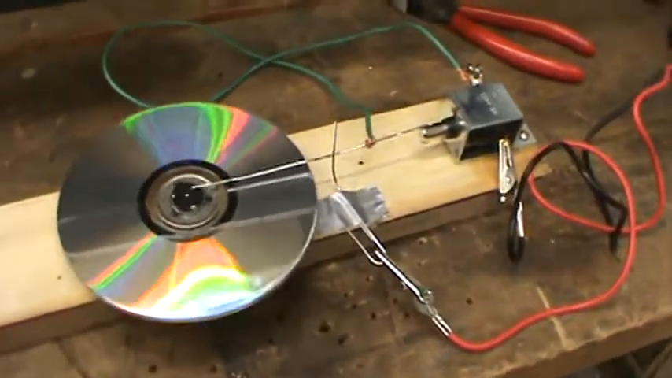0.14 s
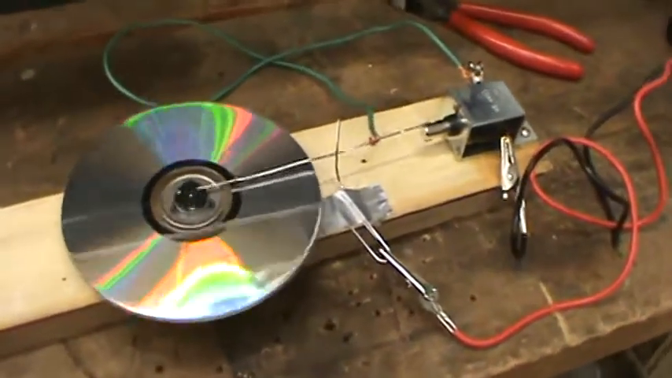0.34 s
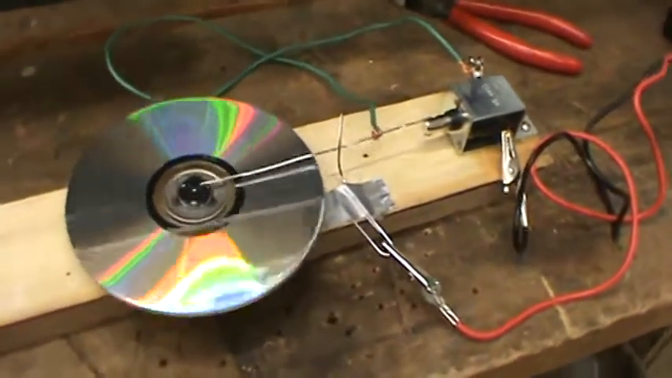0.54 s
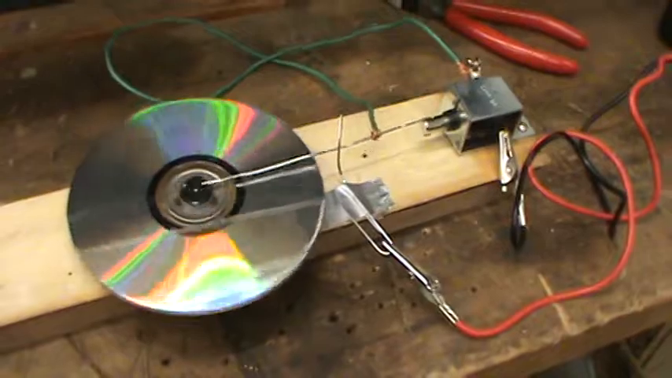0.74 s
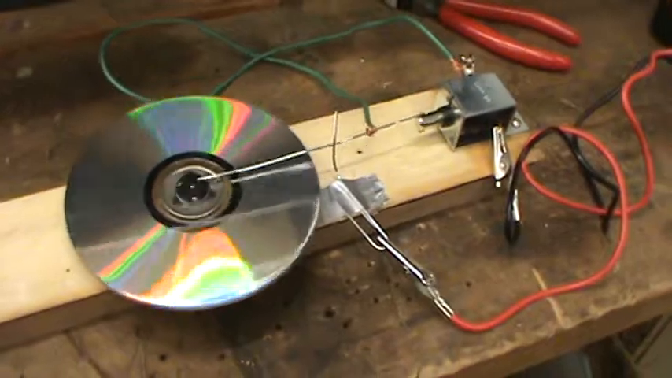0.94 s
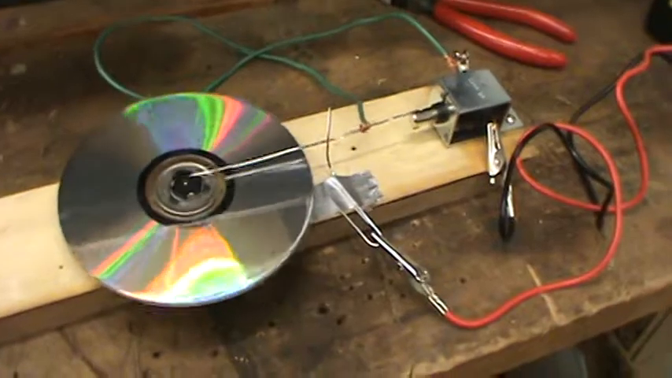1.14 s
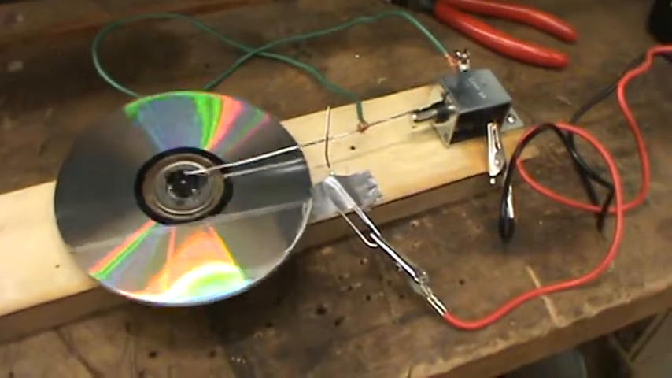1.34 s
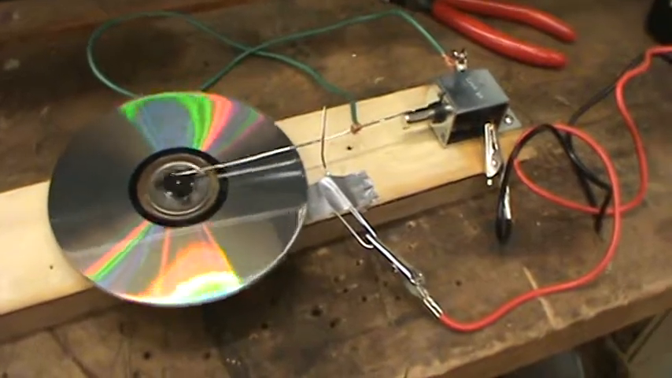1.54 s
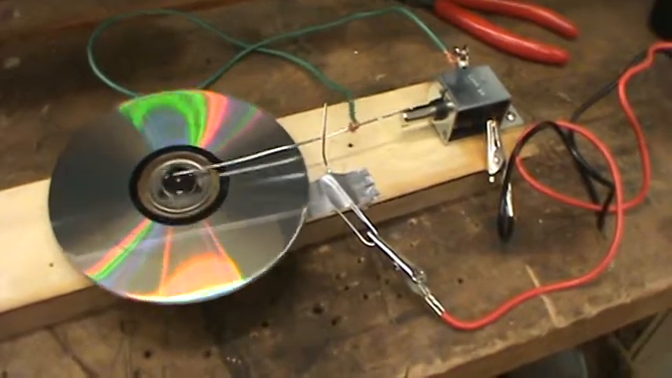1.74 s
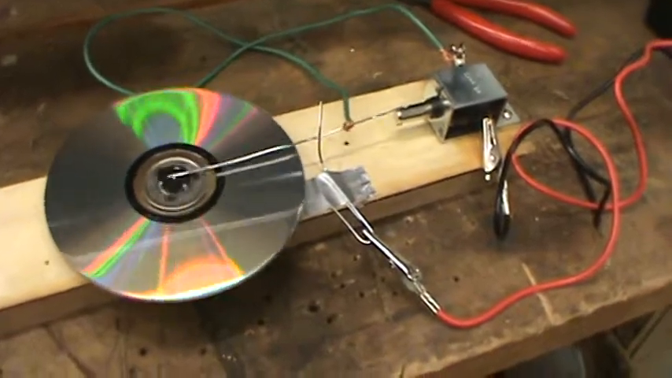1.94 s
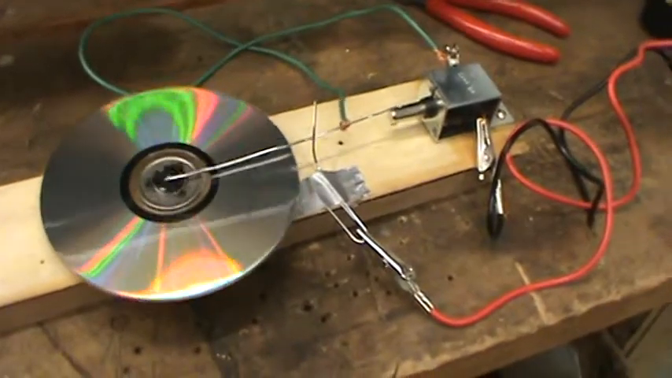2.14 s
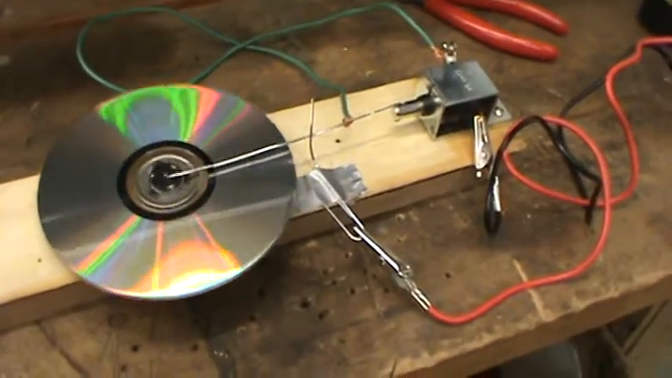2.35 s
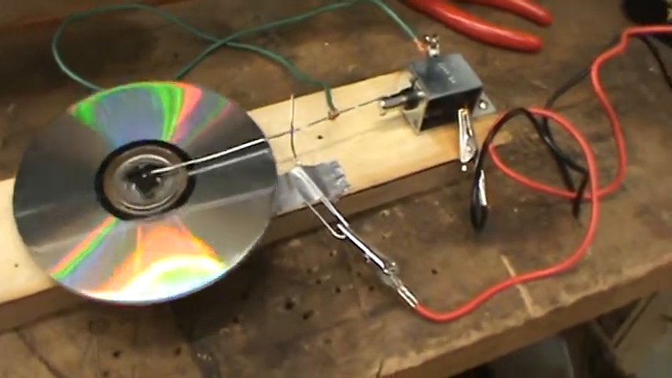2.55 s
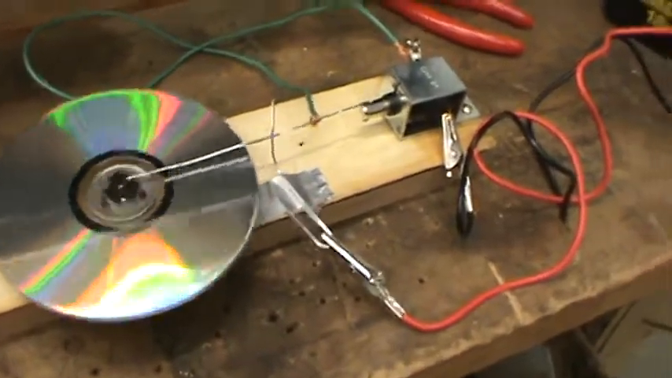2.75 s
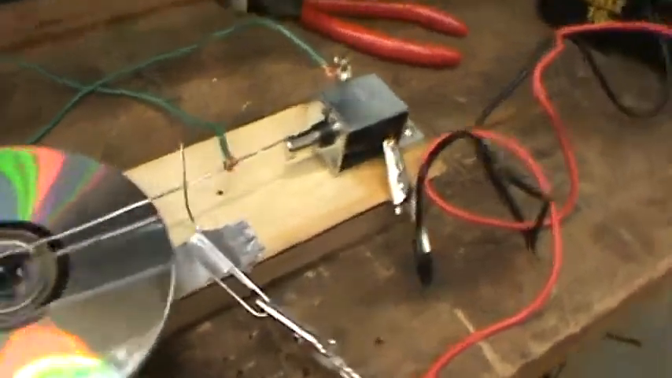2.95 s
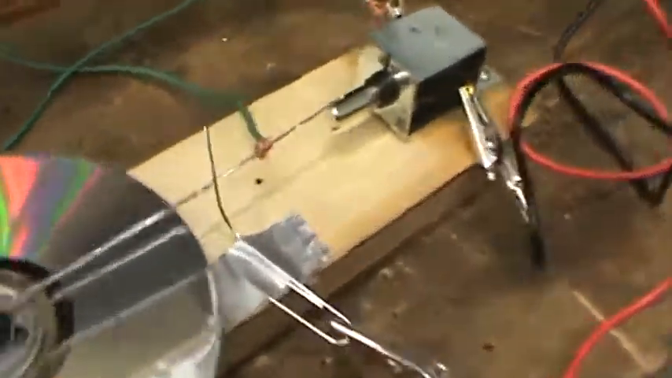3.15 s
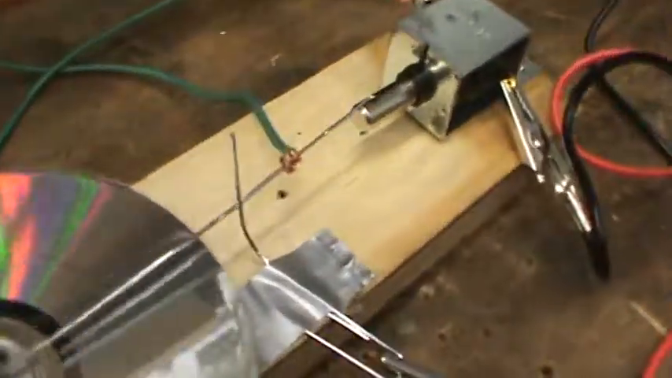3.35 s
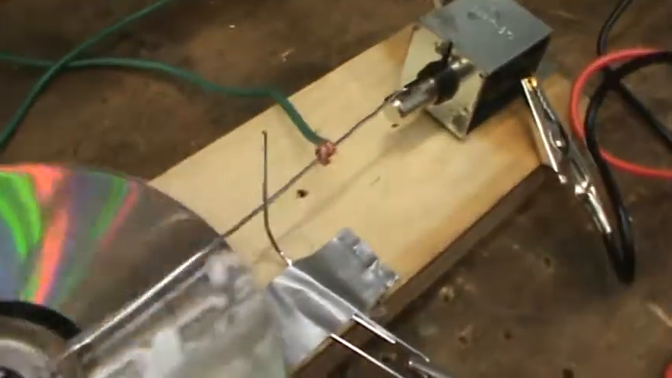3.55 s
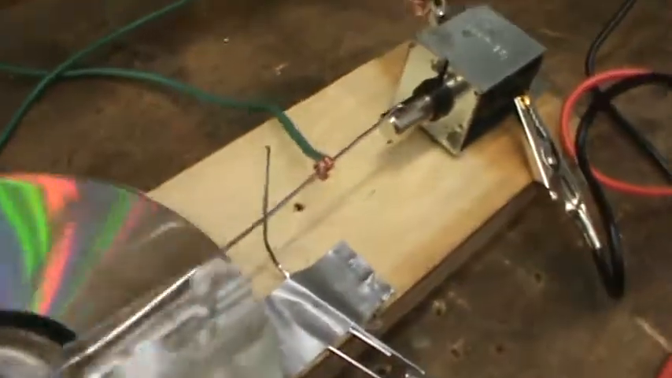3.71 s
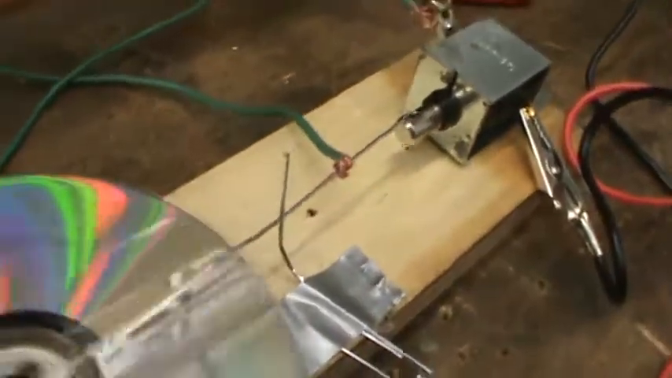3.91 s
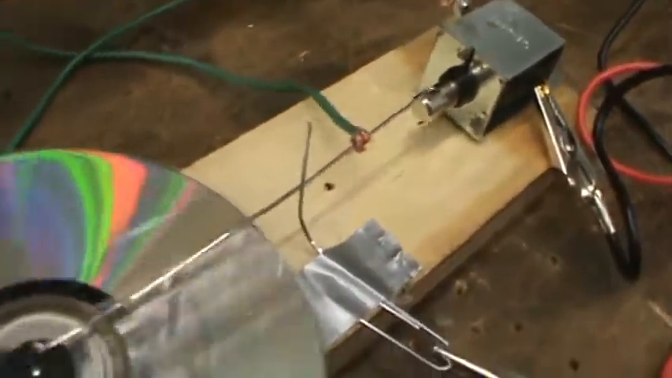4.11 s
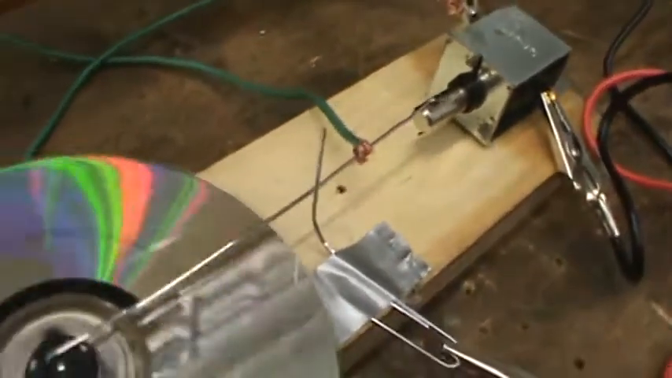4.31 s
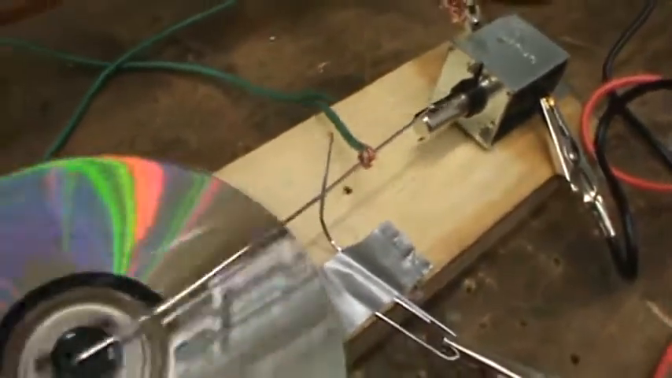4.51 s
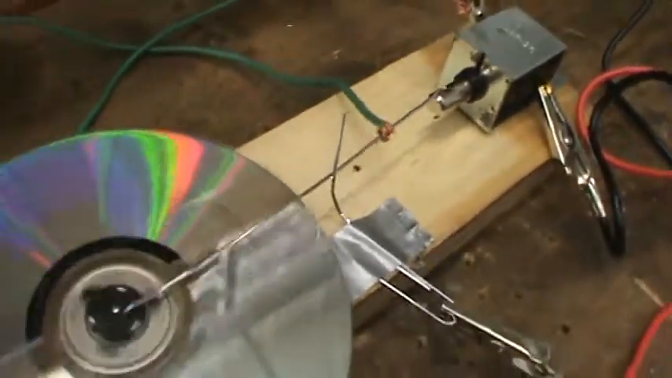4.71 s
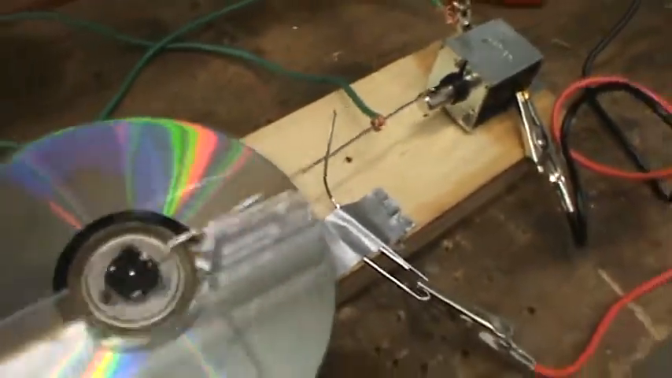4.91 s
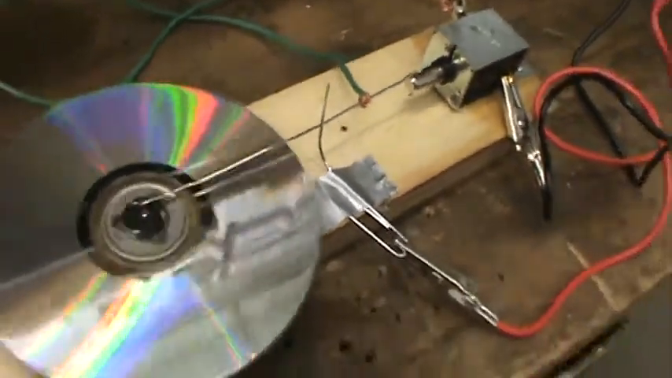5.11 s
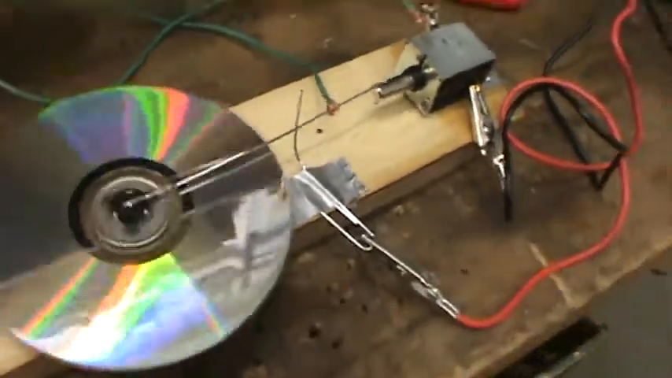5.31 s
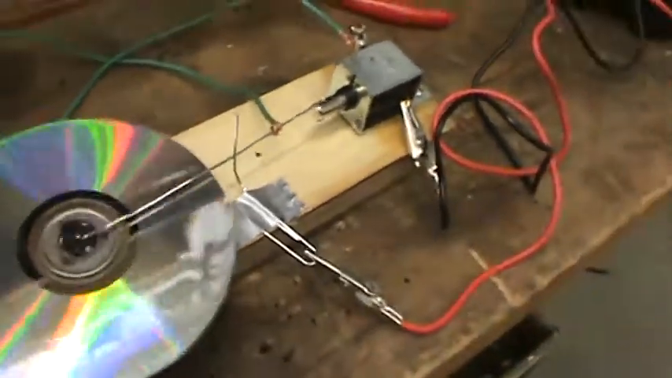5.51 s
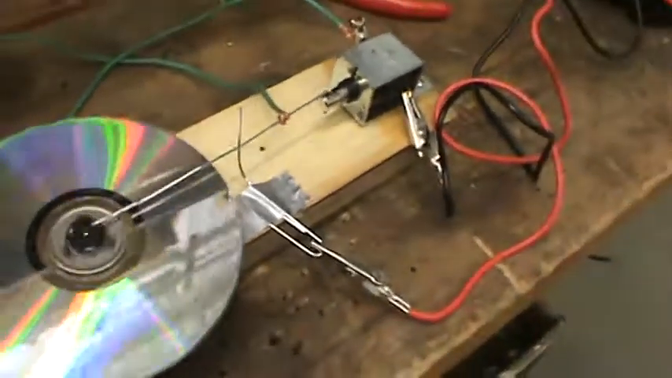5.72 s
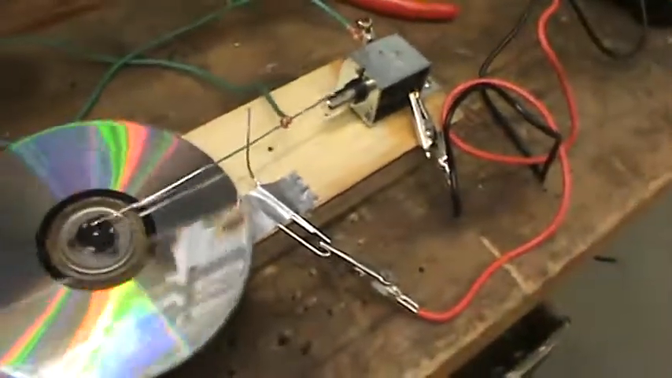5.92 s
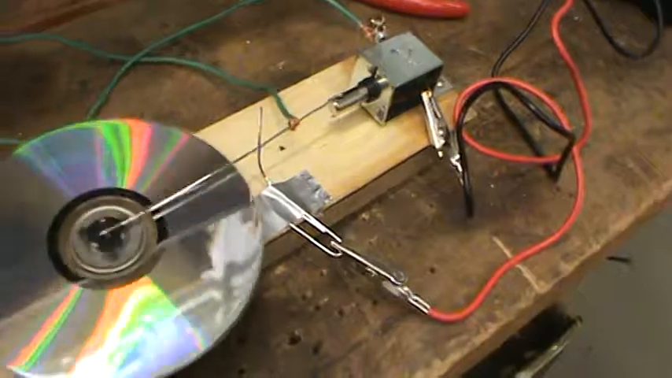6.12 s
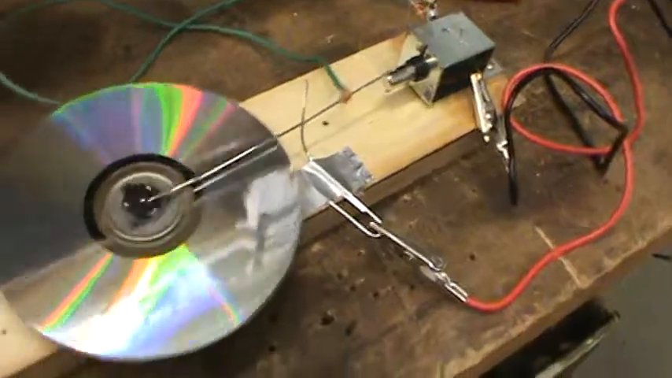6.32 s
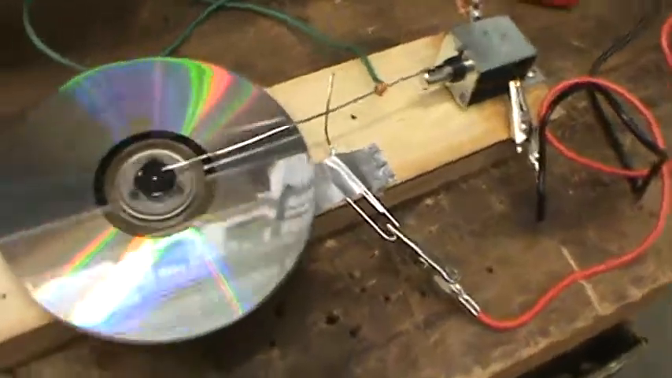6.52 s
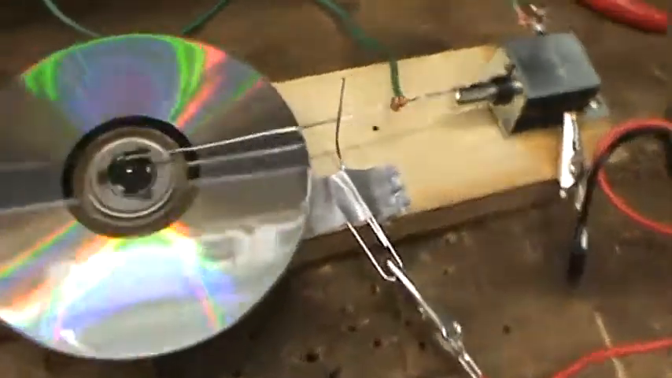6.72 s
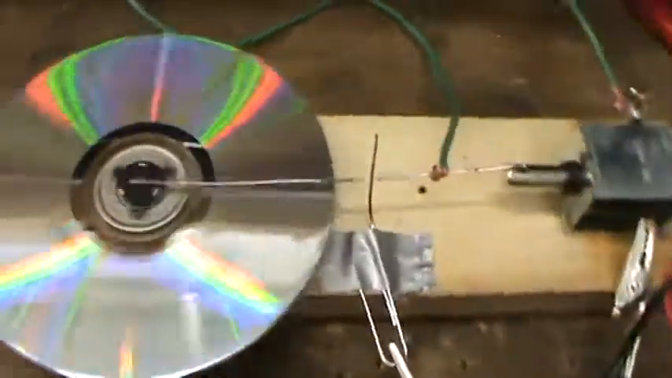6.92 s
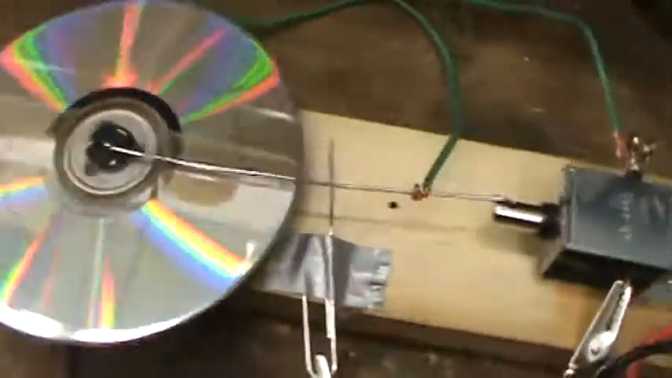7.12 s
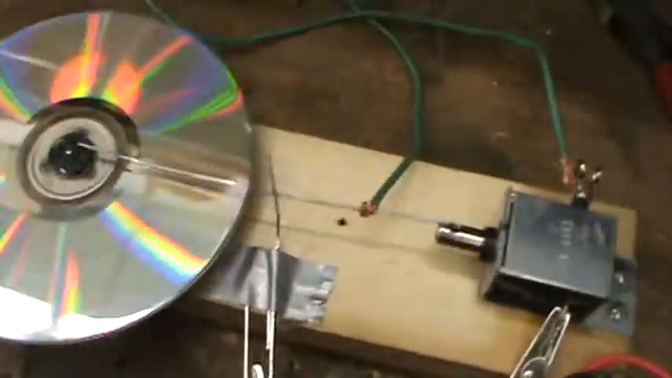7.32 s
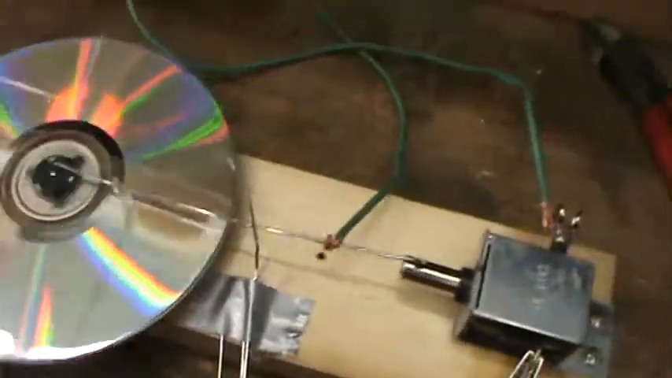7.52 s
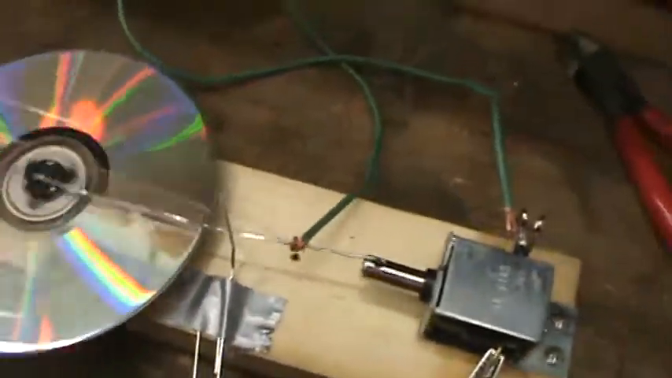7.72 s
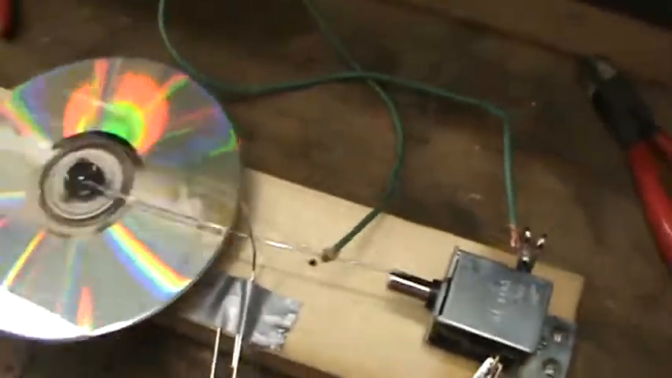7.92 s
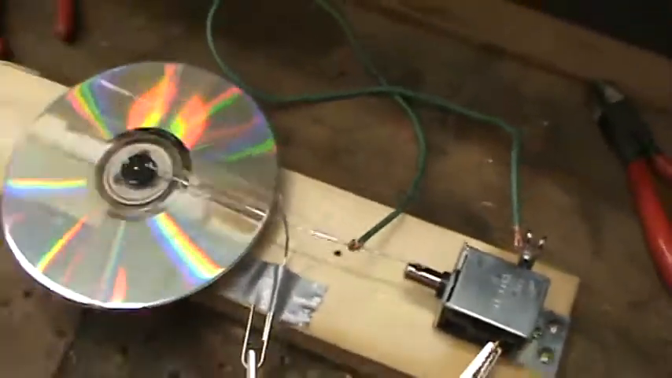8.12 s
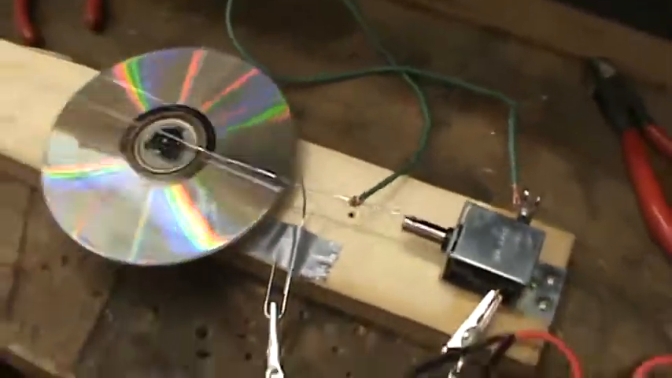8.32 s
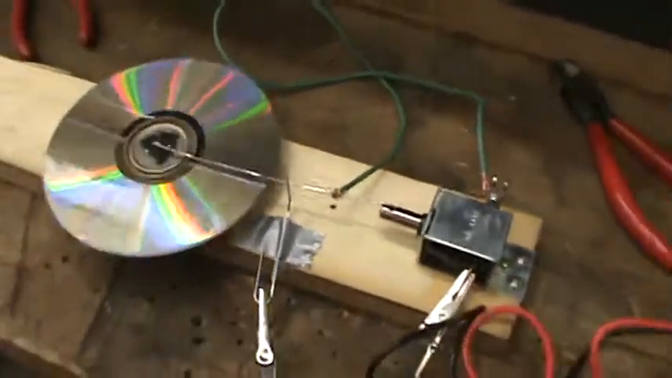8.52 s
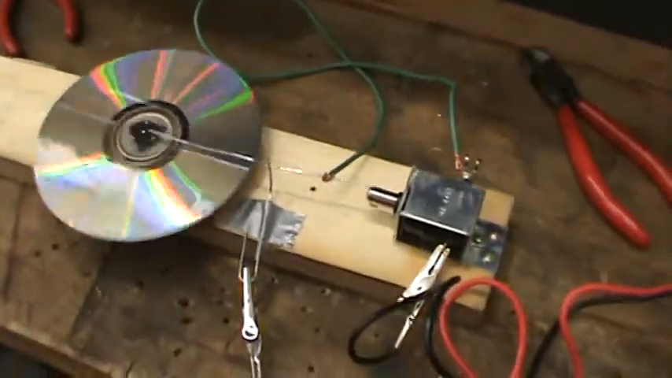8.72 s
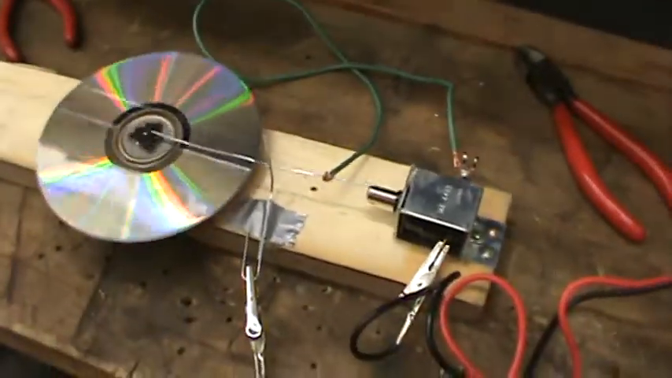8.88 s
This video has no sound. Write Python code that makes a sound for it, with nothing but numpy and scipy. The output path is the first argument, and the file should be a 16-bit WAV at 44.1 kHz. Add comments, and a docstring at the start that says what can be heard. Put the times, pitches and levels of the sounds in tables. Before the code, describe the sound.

A quick mechanical clatter, already running and never stopping: dry metallic snaps, occasionally doubled by a rebound, with a plastic flywheel rattling loosely between them and tiny scratchy wire ticks before each one. It speeds up gently, then holds steady, while the rattle grows looser. Close hand-held stereo microphone, thin in bass, in a modest workshop with low steady air noise.

```python
"""A quickening metallic clack: a solenoid engine on a wooden board, close to a hand-held camera in a workshop.
Once a turn the contact wire chatters on the push rod, the rod knocks the crank of the plastic disc flywheel,
and the plunger snaps home, at times with a rebound; the loose disc then rattles three times.
Blows ring the modes of each part; shaped noise makes the board, bearing, hiss and air.
The room answers, and a fast limiter ducks everything around each loud peak."""
import sys
import numpy as np
from scipy import signal
from scipy.fft import rfft, irfft, next_fast_len
from scipy.io import wavfile
from scipy.ndimage import uniform_filter1d, minimum_filter1d, map_coordinates

SR = 44100
rng = np.random.default_rng(int(sys.argv[2]) if len(sys.argv) > 2 else 0)


def store_wav(level_fs):
    """Save 16-bit WAV to argv[1]."""
    pcm = np.round(np.clip(np.atleast_2d(level_fs), -1, 1) * 32767)
    wavfile.write(sys.argv[1], SR, pcm.T.astype(np.int16))


N = 394694

# room tone, relative spectrum: pitch_hz, density_db [dB per Hz]
AIR_SPECTRUM = [(25, -18), (70, 15.5), (100, 13), (230, 13.5), (800, 7), (1900, 12.5), (6000, -15),
                (10000, -34), (16000, -39)]
# how fast the room's answer dies: pitch_hz, t60_s
ROOM_DECAY = [(1000, 0.77), (7000, 0.37), (12000, 0.44)]
# low resonances of the wooden board: pitch_hz, width_hz, level_db
BOARD_RESONANCES = [(92.6, 2.4, -1), (146.5, 17, -2), (228.2, 13.8, 0.5), (392.3, 18.4, 1.5),
                    (642, 173, -7.5), (816, 143, -3)]
# bearing noise, relative spectrum: pitch_hz, density_db [dB per Hz]
BEARING_SPECTRUM = [(1200, -4), (1700, 4.5), (2100, -9.5), (4300, 5), (4800, 0.5), (5700, 7.5),
                    (8400, -0.5), (11500, -20)]
# one long rush of bearing noise: time_s, level_db
BEARING_RUSH = [(7.3, -59), (7.35, -32.5), (7.41, -33), (7.45, -47)]
# ringing modes of each part, varied a little at every blow: pitch_hz, level_db (relative), t60_s
WIRE_MODES = [(6750, 10.5, 0.0027), (7760, -0.5, 0.0052), (7740, 8, 0.0052), (9030, -5.5, 0.011),
              (9780, -6.5, 0.0044)]
DISC_MODES = [(1278, -7, 0.02), (1637, -1, 0.024), (1897, 4.5, 0.02), (2119, 3.5, 0.022),
              (2390, 4.5, 0.013), (2756, -1.5, 0.021), (3106, 0, 0.021), (4390, 2, 0.0026),
              (7300, -33, 0.0031)]
COIL_FRAME_MODES = [(1920, -1.5, 0.0018), (3008, -8.5, 0.018), (3770, -4, 0.0076), (4173, -6.5, 0.0097),
                    (5374, 5, 0.0033), (6450, 0, 0.0068), (6840, 1.5, 0.0064), (7405, -2, 0.0061),
                    (8380, -3.5, 0.0079), (9640, -14, 0.0054), (10350, -10, 0.0046), (15100, -32, 0.0039)]
# base levels and balance as the camera moves: time_s, rattle_db, board_db, disc_tilt_db [dB per octave],
# disc_pan_db, coil_pan_db [left minus right], wire_db
CAMERA_VIEW = [(0, -45.5, -49.5, 5, 2, 1, -28), (2.6, -44.5, -46.5, 5, 2, 3, -26.5),
               (3.2, -47, -47, -6.5, 4, 2, -21.5), (4.6, -39.5, -48, 0, 4.5, 1.5, -22),
               (5.3, -39.5, -47, 6, 3, 3, -26.5), (6.6, -39.5, -47.5, 4.5, 2.5, 2.5, -25.5),
               (7.3, -37.5, -47.5, -2.5, 2.5, 0.5, -18), (8.95, -39, -54, -1.5, 0.5, 1, -24.5)]
# one row a turn, levels are peaks before the bass cut:
# snap_s, snap_db, knock_ahead_ms [before the snap], knock_db, rattle_1_db, rattle_2_db, rattle_3_db
STROKES = [(0.1118, 0, 9.7, -12.5, -36, -36, -41), (0.3262, 1, 24.3, -11.0, -38, -29, -37),
           (0.5322, 2.5, 23.4, -7, -38, -25, -33), (0.7332, 1.5, 23.6, -13.5, -36, -33, -29.0),
           (0.9297, 0.5, 23, -9.0, -32, -36, -40), (1.1219, 1, 18, -14.5, -29, -34, -30.0),
           (1.3106, 0, 19.9, -9, -34, -27, -29), (1.495, 2.5, 18.6, -6.5, -39, -25, -27),
           (1.6766, -5, 19.6, -9, -16, -25, -40), (1.8561, -4.5, 21.5, -10.5, -25.5, -44, -33),
           (2.0312, 1, 18.1, -7.5, -26, -41, -25), (2.211, -5.5, 23, -7, -39, -22, -27.0),
           (2.3868, -5.5, 21, -8.5, -36, -25, -33), (2.5604, 1.5, 18, -11.5, -21, -23, -26.5),
           (2.7339, -5.5, 14.8, -12.5, -36, -25, -26.5), (2.9082, -2.5, 17, -11, -44, -34, -25.5),
           (3.0777, 3.5, 18.5, -8.5, -36, -25, -23), (3.25, -6, 20.3, -6, -19.5, -24, -26.5),
           (3.418, 0, 17.0, -4.5, -41, -18, -22), (3.5882, -6.5, 20, -7, -22, -25, -27),
           (3.7558, -4, 17.1, -3.5, -19.5, -19, -19), (3.9228, 0, 17.8, -3.5, -17.5, -19, -18),
           (4.0889, -5.5, 18.6, -8.5, -10, -27, -26), (4.2552, -4, 18.6, -5, -36, -28.5, -33),
           (4.4191, -2.5, 17.6, -6, -19.5, -34, -27.0), (4.5843, -6.5, 16.5, -4.5, -19, -13.5, -28),
           (4.7481, -6, 17.5, -8, -17, -26.0, -22.5), (4.911, -2, 15.2, -9, -38, -42, -23),
           (5.073, -1.5, 15.2, -10, -21, -20, -33), (5.2339, 2.5, 16, -11.5, -20, -24, -45),
           (5.3942, 3.5, 16, -9, -36, -21.0, -24), (5.5527, -1.5, 11.8, -13.5, -18, -33, -34),
           (5.7142, 3.5, 16.8, -9, -39, -37, -40), (5.8714, 0.5, 16.3, -9.0, -24, -19.5, -27),
           (6.0325, 4, 15.4, -12, -18, -36, -43), (6.1925, -6.5, 22, -10, -37, -25, -37),
           (6.3511, -1, 16.1, -9, -22.0, -19, -27), (6.5113, 0, 12.4, -9.5, -18, -22, -41),
           (6.6694, 1.5, 16, -8, -23, -18, -25), (6.8285, 4.5, 17.3, -6, -36, -29.0, -24.0),
           (6.9861, 0, 18, -8, -24, -27, -34), (7.147, -3.5, 20.4, -7.5, -23.5, -21, -36),
           (7.3033, 3, 17, -4.5, -17.5, -19, -18), (7.4645, 1, 14, -4.5, -34, -36, -23.5),
           (7.6248, 1, 16.7, -6.5, -19.0, -14, -20), (7.7836, 0, 14.7, -3.5, -16, -18, -29),
           (7.9437, 1, 15.6, -5, -31, -17, -35), (8.1001, 1, 11.7, -6.5, -16.5, -15.5, -25),
           (8.2579, 1.5, 13.4, -9, -16, -23, -31), (8.4142, -3, 15, -8, -15, -18, -26),
           (8.5719, -1, 16.5, -8, -23.0, -18.5, -25.0), (8.7276, 2, 14.1, -9.5, -19, -15, -22),
           (8.8838, 0, 15.2, -7, -22, -15, -36)]
# the plunger lands again: start_s, level_db (peak before the bass cut)
REBOUNDS = [(2.2225, -11), (2.922, -9.5), (3.601, -11), (4.2681, -6.5), (4.4331, -15), (4.763, -13),
            (5.4093, -3), (5.728, -2), (6.2062, -4.5), (6.8415, -7), (7.0006, -3), (7.1582, -6),
            (7.4795, -9), (8.5855, -5.5)]
# disc knocks out of the pattern: start_s, level_db (peak before the bass cut)
STRAY_KNOCKS = [(0.0843, -13.5), (0.319, -12.5), (0.5214, -10.5), (0.728, -10.0), (0.7892, -22),
                (1.1167, -13), (1.3027, -14.5), (2.7873, -25), (2.9676, -27.5), (3.0706, -20), (3.126, -22),
                (3.1848, -23), (3.471, -23), (3.582, -17), (3.867, -26), (4.025, -20), (4.0827, -13.5),
                (4.266, -14.5), (4.52, -22.0), (4.6836, -24), (4.7612, -18), (4.8024, -29), (5.4962, -26),
                (6.0801, -20), (6.6642, -20), (7.1959, -24), (7.3713, -24), (7.4801, -20), (7.7238, -26),
                (7.9916, -23), (8.1521, -28), (8.3074, -23), (8.5029, -22), (8.6182, -27), (8.8347, -26)]

# chatter after first contact: share of the contact force, time to die by 1/e
HARD_CHATTER, HARD_CHATTER_S = .07, .003
SOFT_CHATTER, SOFT_CHATTER_S = .09, .002
TOUCH_TURN = .233  # the wire first touches this share of a turn before the snap
SKIP_S = (0, .0098, .019)  # touches on the rod, after the first one
SKIP_DB, SKIP_SCATTER_DB = (6, 7.5, -15), 1.5  # relative to wire_db
RATTLE_TURN, RATTLE_SCATTER_S = (.258, .388, .532), .001  # shares of a turn after the snap
KNOCK_RISE_S = .0007  # the plastic disc takes a blow softly
SWELL_DB = 5  # the loose rattle swells late in the turn, while the wire's chatter shakes the disc
TOP_HZ = 16200


def amp(db):
    """Gain of a level in dB."""
    return 10 ** (np.asarray(db) / 20)


def unit(x):
    """x at rms 1."""
    return x / np.sqrt(np.mean(x ** 2) + 1e-20)


def along(points, hz):
    """Value at hz of (Hz, value) points on a log frequency axis."""
    f, value = np.transpose(points)
    return np.interp(np.log(hz + 1), np.log(f + 1), value)


def filtered(x, response):
    """x times a response of frequency."""
    size = next_fast_len(N + SR // 2)
    hz = np.fft.rfftfreq(size, 1 / SR)
    return irfft(rfft(x, size) * response(hz), size)[..., :N]


def wobble(rate):
    """A smooth random curve, rate knots a second."""
    knots = rng.standard_normal(int(N * rate / SR) + 4)
    return map_coordinates(knots, [np.arange(N) * rate / SR])


def view(column, s):
    """One column of the camera's view at times s."""
    points = np.transpose(CAMERA_VIEW)
    return np.interp(s, points[0], points[column])


def placed(x, pan_db):
    """A source between the two microphone ports, set by their level difference."""
    return x * amp(np.outer([1, -1], pan_db) / 2)


def small(x, edge_hz):
    """Small parts radiate no bass: a steep high-pass."""
    return signal.sosfilt(signal.butter(3, edge_hz, "high", fs=SR, output="sos"), x)


def homes():
    """Times at which the plunger snaps home, with one turn more at each end."""
    home = np.transpose(STROKES)[0]
    return np.r_[2 * home[0] - home[1], home, 2 * home[-1] - home[-2]]


def crank():
    """Share of the turn since the plunger last snapped home."""
    home = homes()
    return np.interp(np.arange(N) / SR, home, np.arange(len(home))) % 1


def knocks():
    """Times and levels of all firm blows on the disc: crank knocks, rattles and strays."""
    home, _, ahead_ms, knock_db, *rattle_db = np.transpose(STROKES)
    late_s = np.outer(np.diff(homes())[1:], RATTLE_TURN)
    rattle_s = home[:, None] + late_s + RATTLE_SCATTER_S * rng.standard_normal(late_s.shape)
    stray_s, stray_db = np.transpose(STRAY_KNOCKS)
    s = np.r_[home - ahead_ms / 1e3, rattle_s.ravel(), stray_s]
    db = np.r_[knock_db, np.transpose(rattle_db).ravel(), stray_db]
    return s, db


def loose(allowed, rate):
    """Times and size scatter (0-1) of random small contacts, drawn at rate a second, kept where allowed."""
    draw = rng.random((int(rate * N / SR), 2))
    kept = draw[allowed[(draw[:, 0] * (N - 1)).astype(int)]]
    return kept[:, 0] * N / SR, kept[:, 1]


def strike(s, db, modes, attack_s, chatter, chatter_s, count, tilt_db=0):
    """Each blow is one contact plus a short chatter, ringing the modes at new strengths and pitches."""
    hz, level_db, t60 = np.transpose(modes)[:, None, :, None]
    t = np.arange(count) / SR
    # per blow and mode: strength scatter in dB, pitch scatter as a share
    scatter = rng.standard_normal((len(s), len(modes), 2)) * [1.8, .012]
    tilt = np.reshape(tilt_db, (-1, 1, 1)) * np.log2(hz / 2000)
    level_db = level_db + scatter[..., :1] + tilt
    sign = (-1) ** np.arange(len(modes))[:, None]  # neighbouring modes start in opposite phase
    tones = np.sin(2 * np.pi * hz * (1 + scatter[..., 1:]) * t)
    rings = sign * amp(level_db - 60 * t / t60) * tones
    force = chatter * rng.standard_normal((len(s), count)) * np.exp(-t / chatter_s)
    force[:, 0] = 1
    blows = signal.fftconvolve(rings.sum(axis=1), force, axes=1)[:, :count]
    blows *= 1 - np.exp(-t / attack_s)
    blows *= amp(db)[:, None] / abs(blows).max(axis=1, keepdims=True)
    where = np.round(s * SR).astype(int)[:, None] + np.arange(count)
    return np.bincount(where.ravel(), blows.ravel(), N + count + SR)[:N]


def room_tone():
    """Steady air and preamp noise, alike in the bass, nearly opposite in phase between the ports in the treble."""
    mid, side = filtered(rng.standard_normal((2, N)), lambda hz: amp(along(AIR_SPECTRUM, hz)))
    width = [(100, -15.5), (2500, -1.0), (12000, 32.5)]  # pitch_hz, side gain in dB
    side = filtered(side, lambda hz: amp(along(width, hz)))
    return amp(-49.0) * unit(np.array([mid + side, mid - side]))


def shop(x):
    """The room's answer: each frequency dies at its own speed, with a fresh tail every third of a second."""
    out, hop = np.zeros((2, N + 2 * SR)), SR // 3
    for start in range(0, N, hop):
        hz, t, z = signal.stft(rng.standard_normal((3, SR // 2)), SR, nperseg=256)
        decay = amp(-60 * t / along(ROOM_DECAY, hz)[:, None])
        common, left, right = signal.istft(z * decay, SR, nperseg=256)[1]
        tail = common + 0.3 * np.array([left, right])
        tail /= np.linalg.norm(tail[0])
        wet = signal.fftconvolve(x[None, start:start + hop], tail, axes=1)
        out[:, start + 300:][:, :wet.shape[1]] += wet  # the answer starts 300 samples late
    return out[:, :N]


def bench(pair):
    """The bench top sends a second copy a moment later, by a different path to each port."""
    late = lambda hz: np.exp(-2j * np.pi * np.outer([.00052, .00061], hz))  # delays in s
    return filtered(pair, lambda hz: 1 + 0.17 * late(hz))


def hiss(turn):
    """A thin treble hiss: sets in suddenly while the plunger slides out, sinks a little, then stops at once."""
    def band(hz):
        peak = 1 / (1 + ((hz - 13600) / 500) ** 2)
        return peak + 0.52 / (1 + ((hz - 12500) / 2500) ** 4)

    sliding = (turn > .56) * (turn < .77)
    level_db = -53.5 - 13 * (turn - 0.91) + 2.5 * wobble(60)
    noise = rng.standard_normal((2, N)) + 0.49 * rng.standard_normal(N)  # partly shared by the ports
    return sliding * amp(level_db) * unit(filtered(noise, band))


def board(t, s, db):
    """Every disc knock shakes the board on the bench; noise dies away in its low resonances."""
    blows = np.bincount((s * SR).astype(int), amp(db), N)
    tail_t = t[:SR // 2]
    decay = np.exp(-tail_t / 0.037) + 1.76 * np.exp(-tail_t / 0.0079)
    shake = signal.fftconvolve(blows, decay)[:N]

    def wood(hz):
        total = 0
        for k, (center, width, level_db) in enumerate(BOARD_RESONANCES):
            damping = 1j * hz * width
            total = total + (-1) ** k * amp(level_db) * damping / (center * center - hz * hz + damping)
        return total

    noise = (shake + 0.033) * rng.standard_normal(N)  # a faint steady rumble stays under the knocks
    return amp(view(2, t)) * unit(filtered(noise, wood))


def rubbing(turn, t):
    """Bearing noise, fluttering in level, that fades along the turn, with one long rush."""
    flutter = amp(2.0 * wobble(130))
    noise = unit(filtered(flutter * rng.standard_normal(N), lambda hz: amp(along(BEARING_SPECTRUM, hz))))
    rush = amp(np.interp(t, *np.transpose(BEARING_RUSH), left=-np.inf, right=-np.inf))
    return (amp(view(1, t) + 4.5 - 10 * turn) + rush) * noise


def contact(turn):
    """The wire touches and skips on the rod late in the turn, with loose chatter over its last fifth."""
    home = homes()[:-1]
    touch_s = home[1:] - TOUCH_TURN * np.diff(home)
    s = (touch_s[:, None] + SKIP_S).ravel()
    scatter_db = SKIP_SCATTER_DB * rng.standard_normal((len(STROKES), len(SKIP_S)))
    db = view(6, s) + (SKIP_DB + scatter_db).ravel()
    loose_s, size = loose(turn > .81, 700)
    s, db = np.r_[s, loose_s], np.r_[db, view(6, loose_s) - 6 + 11 * size]
    blows = strike(s, db, WIRE_MODES, 0.000065, SOFT_CHATTER, SOFT_CHATTER_S, count=450)
    return small(blows, 7750)


def disc(turn, s, db):
    """Firm blows ring the plastic disc softly, with loose, mostly fainter rattle between them."""
    loose_s, size = loose(turn > .15, 170)
    shaken = turn[(loose_s * SR).astype(int).clip(0, N - 1)] > .82
    loose_db = view(1, loose_s) - 4 + 17 * size ** 2 + SWELL_DB * shaken
    s, db = np.r_[s, loose_s], np.r_[db, loose_db]
    blows = strike(s, db, DISC_MODES, KNOCK_RISE_S, SOFT_CHATTER, SOFT_CHATTER_S, count=1100,
                   tilt_db=view(3, s))
    return small(blows, 400)


def plunger():
    """Steel on steel: snaps and rebounds ring the coil frame sharply."""
    s, db = np.transpose([row[:2] for row in STROKES] + list(REBOUNDS))
    blows = strike(s, db, COIL_FRAME_MODES, .0001, HARD_CHATTER, HARD_CHATTER_S, count=1400)
    return small(blows, 870)


def scene():
    """The engine, its room and the air."""
    t, turn, blows = np.arange(N) / SR, crank(), knocks()
    steel = plunger() + contact(turn)
    plastic = disc(turn, *blows)
    bearing = placed(rubbing(turn, t), 0.31)
    near = bench(placed(steel, view(5, t)) + placed(plastic, view(4, t)) + bearing)
    thump = placed(board(t, *blows), -1.3)
    sliding = hiss(turn) * amp([[-1.5], [1.5]])
    answer = amp(-12.5) * shop(steel + plastic)
    return near + thump + sliding + answer + room_tone()


def record(dry):
    """A look-ahead limiter ducks peaks, the preamp rounds the rest; the microphone thins bass, cuts the top."""
    level = np.sqrt(abs(uniform_filter1d((dry ** 2).mean(axis=0), size=40)))
    need = np.minimum(1, 0.25 / (level + 1e-9))
    held = minimum_filter1d(need, size=220, origin=-20)
    limited = dry * uniform_filter1d(held, size=90)
    rounded = limited / (1 + abs(limited / .8) ** 4) ** (1 / 4)
    return filtered(rounded, lambda hz: (hz < TOP_HZ) * (0.19 + 1 / (1 + (78 / (hz + 1)) ** 8)))


dry = scene()
out = record(dry)
store_wav(out)
```